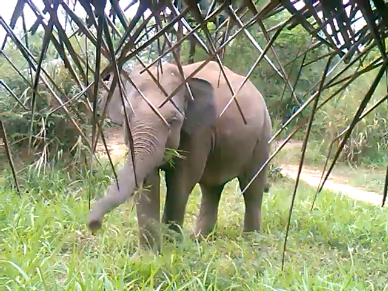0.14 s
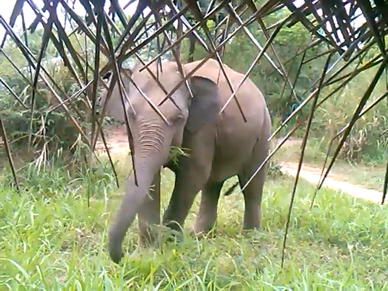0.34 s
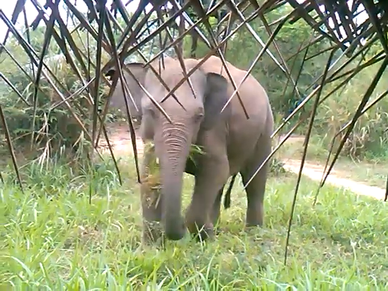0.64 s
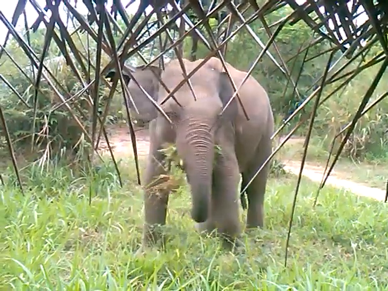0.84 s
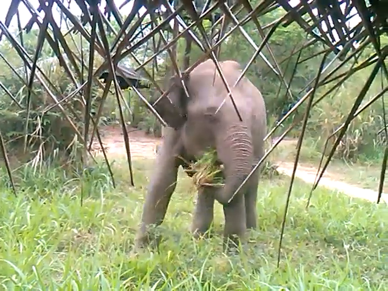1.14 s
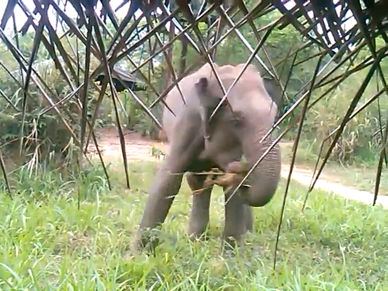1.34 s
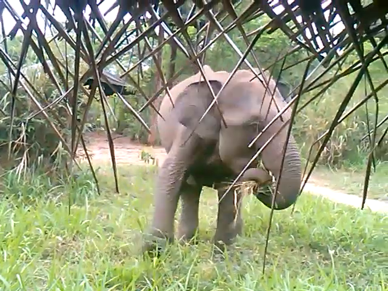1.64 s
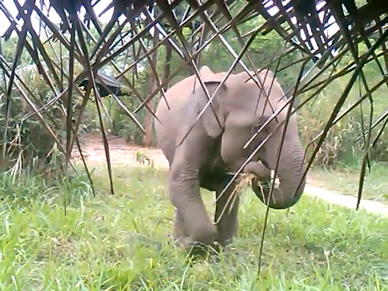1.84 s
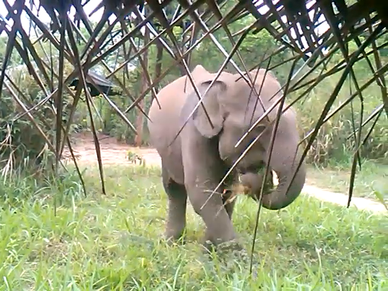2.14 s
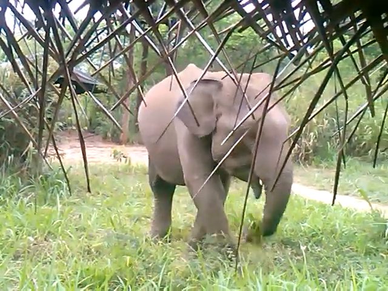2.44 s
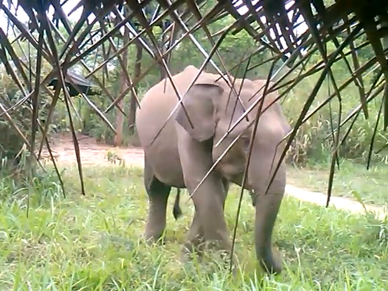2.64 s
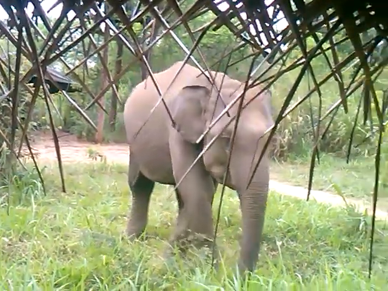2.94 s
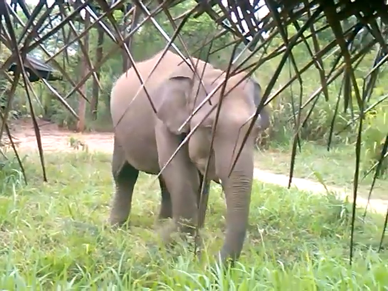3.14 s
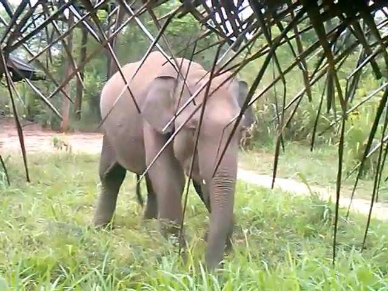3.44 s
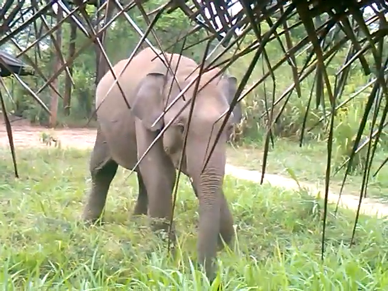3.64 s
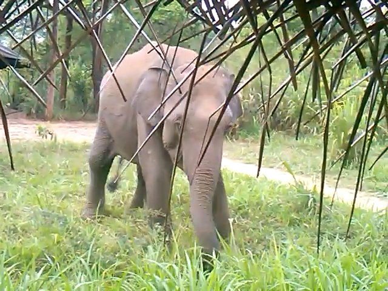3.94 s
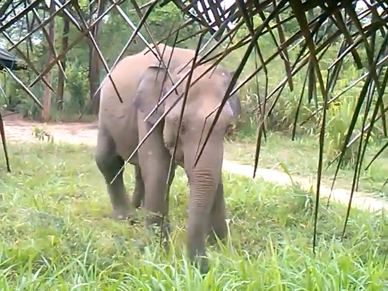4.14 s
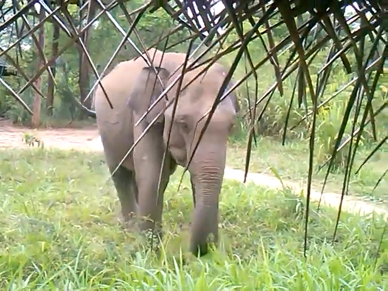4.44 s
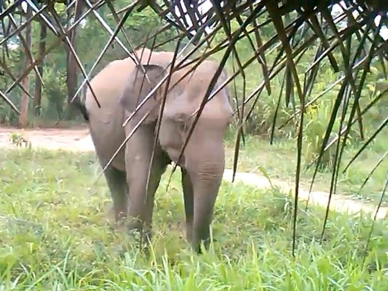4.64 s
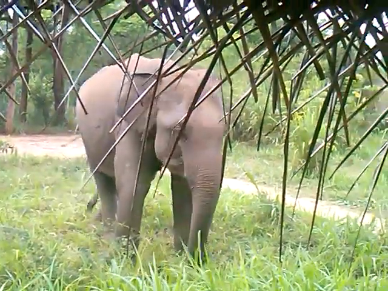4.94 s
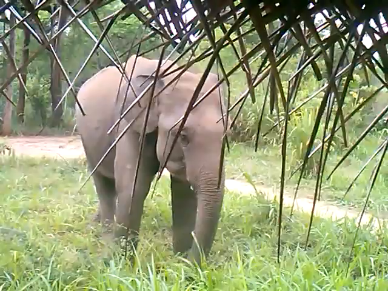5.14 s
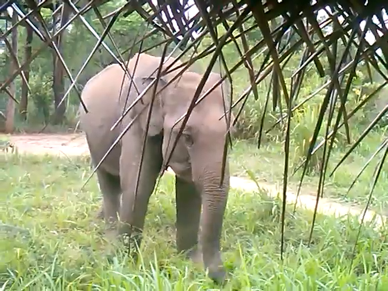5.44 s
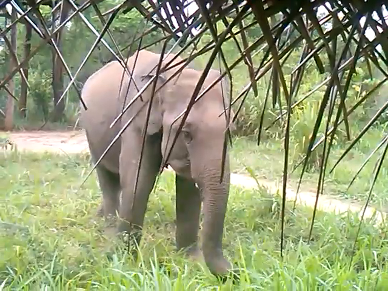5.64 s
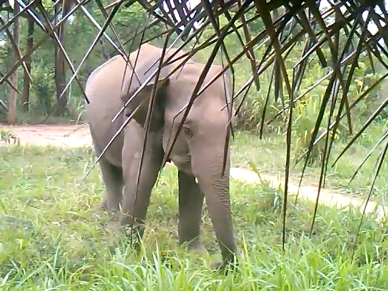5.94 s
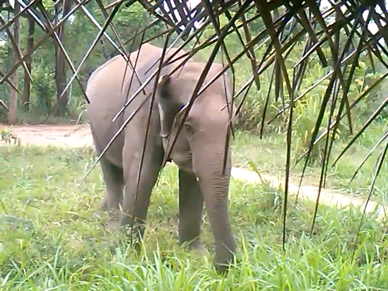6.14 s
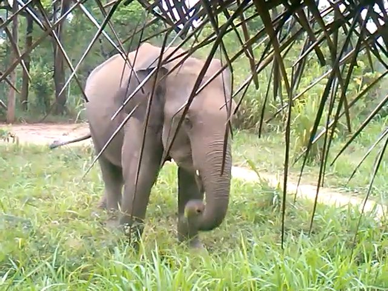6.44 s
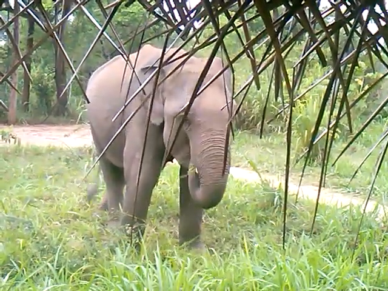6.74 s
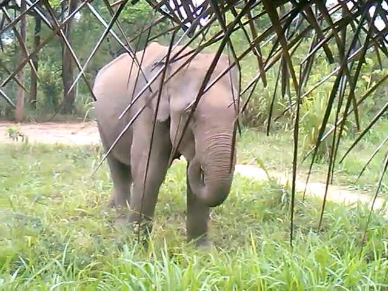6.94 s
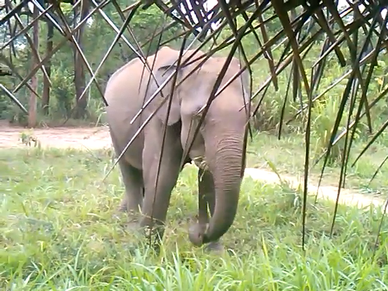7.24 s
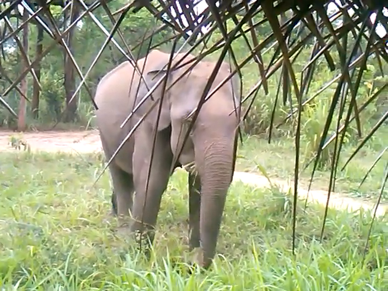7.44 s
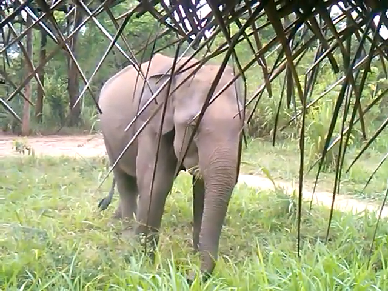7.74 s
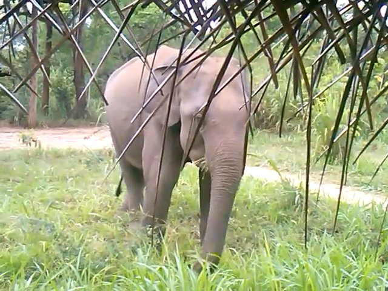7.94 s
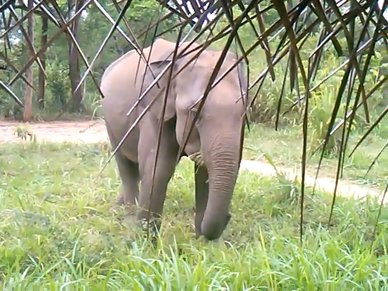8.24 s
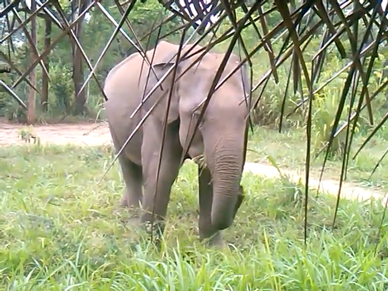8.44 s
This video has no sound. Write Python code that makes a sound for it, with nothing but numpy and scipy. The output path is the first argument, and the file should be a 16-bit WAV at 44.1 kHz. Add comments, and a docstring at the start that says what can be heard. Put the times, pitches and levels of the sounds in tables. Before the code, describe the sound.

Outdoors in a grassy clearing, a large animal tears tufts with its trunk. Dry, bright rustling runs almost throughout, with a cluster of snaps early on, a sharp ripping burst midway and a stronger crackling one later. Small birds chirp and whistle between the trees. The rustle finally fades, leaving faint bird notes, light wind and quiet air, heard by a handheld microphone a few metres away.

```python
"""An elephant a few metres away wades through tall grass and tears up tufts with its trunk.
After a short silence, blades (filtered noise grains) swish and stalks crunch, as one bird (gliding tones)
chirps until about 2 s. Stems snap (noise bursts) in a cluster near 2.1 s; other birds call from then on.
Hard tugs with many cracks come near 4.2 s and, loudest, near 6.1 s. After 7 s the wading sinks away
under faint bird notes. Soft air, wind, hollow tones and dull thumps lie beneath it all."""
import sys
import numpy as np
from scipy import signal
from scipy.fft import rfft, irfft
from scipy.io import wavfile
from scipy.ndimage import uniform_filter1d

SR = 44100
rng = np.random.default_rng(int(sys.argv[2]) if len(sys.argv) > 2 else 0)


def bounce(signal):
    """Save signal as a 16-bit WAV file at the path given by the first command-line argument."""
    frames = np.transpose(np.atleast_2d(signal))
    limited = np.clip(frames, -1, 1)
    pcm = np.round(limited * 32767).astype(np.int16)
    wavfile.write(sys.argv[1], SR, pcm)


N = 378819  # samples, about 8.6 s


def undb(db):
    """Gain of a level in dB."""
    return 10 ** (np.asarray(db) / 20)


def unit(x):
    """Scale to rms 1."""
    return x / np.sqrt(np.mean(x ** 2))


def colour(x, shape):
    """Causal filter through (frequency [Hz], level [dB]) points, from the cepstrum of the log gain."""
    hz, db = np.transpose(shape)
    grid_hz = np.linspace(1, SR / 2, 4097)
    log_gain = np.interp(np.log(grid_hz), np.log(hz), db) * np.log(10) / 20
    cepstrum = irfft(log_gain)
    # folding the second half onto the first makes the filter respond at once, never early
    cepstrum[1:4096] *= 2
    cepstrum[4097:] = 0
    response = irfft(np.exp(rfft(cepstrum)))
    return signal.fftconvolve(x, response)[:N]


def band(x, hz, width_hz):
    """One resonance, gain 1 at its centre."""
    return signal.lfilter(*signal.iirpeak(hz, hz / width_hz, SR), x)


def walk(rate):
    """Random levels held 1 / rate s and smoothed twice; spread near 1."""
    hold = int(SR / rate)
    steps = np.repeat(rng.standard_normal(N // hold + 1), hold)
    return 1.3 * uniform_filter1d(uniform_filter1d(steps, hold), hold)[:N]


def grains(rate, spread_db, tail_s, hiss_db):
    """Noise under the envelope of many small slips: mostly weak, a few stronger, each dying quickly."""
    strength = undb(spread_db * np.minimum(rng.exponential(size=N), 4))
    slips = (rng.random(N) < rate / SR) * strength  # rate: slips per second
    envelope = signal.lfilter([1], [1, -np.exp(-1 / (tail_s * SR))], slips)
    return unit((unit(envelope) + undb(hiss_db)) * rng.standard_normal(N))


def patches(x, edges, flicker_db, rate, tilt_db=0):
    """Split sound into bands that flicker on their own, and lean them all by a tilt in dB per octave."""
    spectrum = rfft(x)
    log_hz = np.log(np.arange(N // 2 + 1) * SR / N + 1)
    octaves = np.log2(edges) - np.log2(edges).mean()
    out = np.zeros(N)
    for octave, share in zip(octaves, np.eye(len(edges))):
        part = irfft(spectrum * np.interp(log_hz, np.log(edges), share), N)
        out += undb(flicker_db * walk(rate) + tilt_db * octave) * part
    return out


# colour of the distant air: (frequency [Hz], relative level per Hz [dB])
AIR_COLOUR = [(100, -31), (160, -25.5), (400, -24), (700, -19.5), (1400, -28), (2600, -22.5), (3500, -35),
              (6000, -42), (10400, -17), (15800, -28)]
AIR_DB = -65.5  # rms


def far_air():
    """Distant leaves and insects: soft noise whose bands flicker separately."""
    noise = colour(rng.standard_normal(N), AIR_COLOUR)
    return undb(AIR_DB) * unit(patches(noise, [160, 400, 900, 2000, 4500, 10000], 1.4, 5))


# wind on the microphone: (time [s], level [dB])
WIND_LEVEL = [(.59, -86), (1, -77), (4, -68.5), (8.59, -69.5)]


def wind():
    """Wind rumbling on the microphone: noise kept to the lowest pitches, slowly uneven."""
    rumble_colour = [(10, 4.0), (25, -3.5), (70, 0), (130, -5.5), (300, -32)]  # (Hz, dB per Hz)
    rumble = patches(colour(rng.standard_normal(N), rumble_colour), [25, 50, 100], 2.4, 4)
    level_db = np.interp(np.arange(N) / SR, *np.transpose(WIND_LEVEL))
    return unit(rumble) * undb(level_db)


# faint hollow tones low in the background:
# (time [s], length [s], pitch [Hz], width of each of two filter passes [Hz], level [dB])
HOLLOW_TONES = [(1.12, 0.28, 742, 12, -70), (1.46, 0.21, 408, 260, -58.5), (1.5, .051, 565, 54, -51.5),
                (1.82, .16, 405, 39, -65.5), (2.53, .04, 422, 120, -59.5), (2.64, 0.24, 570, 93, -62.5),
                (2.7, .1, 123.6, 10, -64), (3.2, .29, 904, 57, -68.5), (3.55, .048, 580, 110, -57),
                (3.8, .09, 745, 17, -63.5), (4.501, .08, 200, 45, -62), (5.41, .04, 856, 100, -58),
                (6.4, .2, 887, 100, -60), (6.65, 0.17, 650, 60, -65.5), (6.93, 0.068, 570, 70, -62.5),
                (8.36, .06, 387, 140, -67.5), (8.43, .15, 760, 34, -70)]


def hoots():
    """Noise ringing twice through one resonance, swelling and fading."""
    out = np.zeros(N)
    for s, length, hz, width, db in HOLLOW_TONES:
        u, i = np.linspace(0, 1, int(length * SR)), int(s * SR)
        ringing = band(band(rng.standard_normal(SR // 2), hz, width), hz, width)
        tone = unit(ringing[-len(u):])  # the end, where the ringing has built up
        swell = np.sin(np.pi * u) ** 0.34
        out[i:i + len(u)] += (undb(db) * swell * tone)[:N - i]
    return out


# dull thumps of feet and of hands on the camera: (time [s], starting level [dB], pitch [Hz])
DULL_THUMPS = [(0.952, -62, 266), (2.853, -45, 40.7), (4.27, -44.5, 139), (4.427, -59, 176),
               (4.871, -51, 66.5), (6.075, -50, 234), (7.329, -48.5, 42.8)]
THUMP_T60_S, THUMP_SLOPE = .165, -.3  # 60 dB decay time at 100 Hz; lower thumps ring longer


def thumps():
    """Low, heavily damped blows: fading sine tones with a softened start."""
    out, t = np.zeros(N), np.arange(16384) / SR
    for s, db, hz in DULL_THUMPS:
        i = int(s * SR)
        t60 = THUMP_T60_S * (hz / 100) ** THUMP_SLOPE
        onset = 1 - np.exp(-t / 0.0044)
        out[i:i + len(t)] += undb(db - 60 * t / t60) * np.sin(2 * np.pi * hz * t) * onset
    return out


def whistles(notes):
    """Gliding, unsteady near-sine notes that swell and fade."""
    out = np.zeros(N)
    for s, length, first_hz, last_hz, db, unsteady in notes:
        u, i = np.linspace(0, 1, int(length * SR)), int(s * SR)
        waver = unit(uniform_filter1d(rng.standard_normal(8192), size=60))[:len(u)]
        glide = 1 - (1 - u) ** 1.7  # the pitch levels off towards the end
        hz = (first_hz + (last_hz - first_hz) * glide) * (1 + unsteady * waver)
        tone = np.sin(2 * np.pi * np.cumsum(hz) / SR)
        out[i:i + len(u)] += (undb(db) * np.sin(np.pi * u) ** .5 * tone)[:N - i]
    return out


# one bird's rising chirps: (time [s], length [s], first pitch [Hz], last pitch [Hz], level [dB])
RISING_CHIRPS = [(.745, .017, 2420, 2450, -63.5), (1.03, .014, 2080, 2350, -52),
                 (1.054, 0.016, 2310, 2520, -51), (1.193, 0.015, 2190, 2550, -51.5),
                 (1.21, 0.029, 2780, 3260, -49), (1.405, 0.028, 1990, 2860, -49.5),
                 (1.716, 0.0172, 2150, 2690, -50.5), (1.753, 0.03, 2310, 2624, -46),
                 (1.927, 0.024, 2200, 2550, -51), (1.948, 0.022, 2720, 3280, -45.5)]
# a second bird's falling notes: (time [s], length [s], level [dB])
FALLING_NOTES = [(3.463, 0.023, -50), (3.592, 0.014, -45), (3.743, 0.019, -44), (4.077, 0.043, -44.5),
                 (4.35, 0.045, -43.5), (4.539, 0.033, -45.5), (4.832, 0.049, -46)]
FALL_START_HZ, FALL_HZ_PER_S = 3950, 19000  # shared start pitch and average pace of the drop
# notes of the other birds: (time [s], length [s], first pitch [Hz], last pitch [Hz], level [dB],
# unsteadiness [share of the pitch])
OTHER_NOTES = [(2.285, .02, 3100, 3200, -52, .03), (2.735, .022, 4430, 4320, -46, .02),
               (3.42, .017, 2350, 2550, -52, .03), (3.69, .016, 2300, 2620, -49, .015),
               (3.875, .085, 3800, 2240, -47, .02), (4.24, .07, 2330, 2306, -46, .003),
               (4.69, .032, 2750, 3050, -47, .045), (6.333, .05, 2400, 2950, -46, .01),
               (6.357, .026, 1370, 1490, -47, .006), (6.515, .037, 2570, 2950, -45.5, .09),
               (7.36, .026, 910, 940, -64, .01), (7.4, .13, 2580, 2760, -75, .01),
               (7.45, .17, 3420, 3640, -70, .01), (7.5, .11, 1910, 1780, -67, .065),
               (7.53, .083, 2800, 2920, -72, .003), (7.655, .17, 3610, 4700, -57.5, .02),
               (7.665, .015, 2100, 2400, -66, .03), (7.76, .05, 3250, 3230, -70, .01),
               (7.772, .028, 4600, 5080, -52, .013), (7.8, .08, 3250, 2950, -63, .015),
               (7.862, .17, 2970, 2750, -67, .008), (8.2, .11, 2550, 2630, -70, .017),
               (8.245, .02, 4500, 4100, -72, .03), (8.32, .022, 4600, 4160, -67, .03),
               (8.377, .035, 1900, 1840, -66, .065), (8.4, .025, 5450, 5650, -73, .02),
               (8.5, .03, 5800, 5730, -72, .01), (8.52, .056, 5750, 3950, -65, .006)]
CHIRP_WAVER, FALL_WAVER = 0.043, 0.028  # unsteadiness as a share of the pitch
ECHO_S, ECHO_DB = 0.025, -3.5  # a nearby surface repeats each chirp


def birds():
    """All birds, smeared by the trees; the chirping one also comes back from a nearby surface."""
    chirps = whistles([(*chirp, CHIRP_WAVER) for chirp in RISING_CHIRPS])
    falls = whistles([(s, length, FALL_START_HZ, FALL_START_HZ - FALL_HZ_PER_S * length, db, FALL_WAVER)
                      for s, length, db in FALLING_NOTES])
    echo = undb(ECHO_DB) * np.roll(chirps, int(ECHO_S * SR))
    direct = whistles(OTHER_NOTES) + falls + chirps + echo
    t = np.arange(SR // 2) / SR
    fading = undb(-60 * t / .15) + .7 * undb(-60 * t / .6)  # near trunks, far canopy
    trees = rng.standard_normal(len(t)) * fading
    smear = signal.fftconvolve(direct, trees / np.sqrt(np.sum(trees ** 2)))[:N]
    return direct + undb(-0.5) * smear


# breaking fibres: (time [s], crack peak level before the blade colour [dB], woody knock peak level [dB],
# centre of the crack [Hz], dryness [dB])
BREAKS = [(0.936, -25.5, -56, 8840, 0.5), (1.379, -25, -56, 10100, 8), (1.394, -46, -46, 10100, 0),
          (1.626, -20.5, -56, 8900, -7), (1.661, -23, -55, 7040, -2), (1.6813, -21.5, -58, 8630, -3),
          (2.1033, -32.5, -46, 10200, 6), (2.1157, -23, -35, 7010, 2), (2.123, -21, -23, 7650, 0),
          (2.137, -17.5, -21.5, 4500, -7), (2.1881, -15.5, -22, 5000, -8), (2.5847, -28, -51, 6590, -3),
          (2.757, -37, -46, 10400, 0), (3.5126, -34, -42, 7170, 6), (3.5574, -27, -57, 10500, 3),
          (3.578, -22, -46, 7030, 2), (4.159, -24, -46, 7740, 0), (4.1765, -14, -25, 5390, 9),
          (4.2, -14, -25.5, 7070, 6), (4.2213, -12, -24.5, 7620, 0), (4.2467, -15, -30, 6900, 0),
          (4.2632, -13, -28, 3850, 0.5), (4.2884, -19, -18.5, 9830, 4), (4.308, -23, -30, 10900, 0),
          (4.3368, -20, -31, 6570, 0), (4.3856, -24, -40, 7600, 12), (4.4447, -38, -28.5, 7850, -7),
          (4.6287, -13, -55, 11000, 0), (4.67, -29, -39, 3600, 1), (5.9146, -25, -32, 7400, -5),
          (6.045, -20, -39, 8010, 0), (6.0691, -4, -18, 5200, 2), (6.095, -6.5, -15.5, 7660, 4.5),
          (6.1206, -10.5, -32, 11800, -3), (6.1409, -8, -19, 6620, 6), (6.1644, -9, -19.5, 7090, 7),
          (6.1813, -9, -22, 5930, 5), (6.1923, -11, -16.5, 2600, -3.5), (6.2082, -9, -28, 6970, 0),
          (6.2164, -4, -28, 9400, -2), (6.2578, -5.5, -27.5, 8500, 7.5), (6.316, -33, -29, 9940, 14),
          (6.406, -7.5, -54, 8440, 13), (7.0646, -45, -41.5, 10100, -3), (7.1468, -36, -43, 5810, 0),
          (7.36, -55, -42.5, 3200, -3), (7.9982, -36.5, -63, 10900, -12), (8.0284, -40, -55, 7460, -3),
          (8.1004, -50, -54, 10100, 1), (8.1764, -47, -68, 7330, 0), (8.483, -41, -68, 9900, -15)]
# stalk resonances: (pitch [Hz], width [Hz], relative level [dB])
STALK_RESONANCES = [(560, 190, -14), (1193, 110, -7), (1890, 670, -2), (3100, 1500, -9.5)]
# colour of the blades, for cracks here and the swish below: (frequency [Hz], relative level per Hz [dB])
BLADE_COLOUR = [(900, -42), (1500, -17), (2400, -12), (3200, -13), (4100, -6.5), (6000, -5), (7500, -2),
                (8400, -5), (10200, -2), (11200, -4), (12100, -5), (13000, -7), (15800, -9.5)]
# fray times hold at dryness 0; T60 is the time to fall 60 dB
FRAY_RISE_S, FRAY_T60_S, CRACK_T60_S = 0.001, .04, 0.0034


def snaps():
    """Each break starts with a crack, sharp in dry stems, and frays out; a knock rings the stalk."""
    crack, knock, t = np.zeros(N), np.zeros(N), np.arange(8192) / SR
    for s, crack_db, knock_db, hz, dry_db in BREAKS:
        i = int(s * SR)
        crack_noise, knock_noise, steps = rng.standard_normal((3, len(t)))
        ragged = undb(4.03 * unit(uniform_filter1d(steps, size=40)))  # fibres part in several steps
        # green stems give way slower and fray longer
        rise = 1 - np.exp(-t / (FRAY_RISE_S * undb(-dry_db)))
        fade = undb(-60 * t / (FRAY_T60_S * undb(-.4 * dry_db)))
        force = undb(dry_db - 60 * t / CRACK_T60_S) + ragged * rise * fade
        burst = band(force * crack_noise, hz, 0.6 * hz)  # thin stems crack higher
        crack[i:i + len(t)] += (undb(crack_db) * burst / np.abs(burst).max())[:N - i]
        blow = sum(undb(db) * band(force * knock_noise, f, width) for f, width, db in STALK_RESONANCES)
        knock[i:i + len(t)] += (undb(knock_db) * blow / np.abs(blow).max())[:N - i]
    return colour(crack, BLADE_COLOUR) + knock


# steady wading: (time [s], swish level [dB], crunch level [dB], brightness [dB per octave])
STEADY_WADING = [(.59, -53.5, -72, 3.5), (.77, -69.5, -82, -1), (.92, -45.5, -56, 1), (1.15, -51, -59, 3.5),
                 (1.5, -49.5, -53.5, 3), (1.9, -44, -54, 3), (2.32, -46.5, -53, 3.5),
                 (2.68, -45.5, -54.5, 2.5), (3.08, -53.5, -58, -2), (3.5, -51.5, -57.5, 3.5),
                 (3.9, -44, -53.5, -3), (4.55, -45, -54, 1), (4.8, -47.5, -55, -1), (5.1, -48, -59, 0),
                 (5.6, -45, -56, 0.5), (6.45, -45, -53.5, 0.5), (7.0, -48, -57.5, -3), (7.25, -59, -57, 2),
                 (7.43, -63.5, -62.5, 0), (7.81, -62, -65.5, -1.5), (8.2, -68.5, -68, -4.5)]
WADING_BASS_DB, BASS_PER_BRIGHT = 0.9, -0.16  # dB per octave; duller wading crunches deeper
# strides, sweeps and tugs of the trunk: (peak time [s], swish level [dB], crunch level [dB],
# brightness [dB per octave], bass of the crunch [dB per octave], rise over 10 dB [s], fall over 10 dB [s]);
# rises and falls below 0.004 s, also negative ones, count as 0.004 s
TRUNK_TUGS = [(.95, -43.5, -52.5, 0.5, 1, 0.01, .11), (1.39, -47.5, -59, 4, 3, 0.07, -0.33),
              (1.64, -42, -60, -5.5, 15, 0.04, -0.07), (1.95, -46, -61, 2, -6, 0.24, -0.04),
              (2.146, -37, -49, 1.5, -2, 0.0649, 0), (2.21, -36.5, -48.5, 2.5, -4.5, 0.08, .08),
              (2.6, -57, -57, 0, 2.5, 0.2, -0.1), (3.17, -46.5, -57.5, 3, -2, 0.1, 0.15),
              (3.67, -34.5, -48.5, -1, -0.5, 0.095, 0.18), (4.225, -31, -48, -2, -8, 0.06, 0.13),
              (4.29, -32.5, -37, 1.5, 1, 0.08, 0.0638), (4.454, -43, -42, 0, 2, -0.02, 0.095),
              (5.18, -43.5, -67, 4.5, 6, 0.1, .2), (5.25, -52, -47, 2.5, 0.5, .07, 0.12),
              (5.33, -38, -62, 0.5, -4, .1, 0.15), (5.74, -37.5, -55.5, 0, -3.5, 0.07, 0.34),
              (5.87, -40.5, -58, -2, 1, -0.11, 0.12), (6.052, -31.5, -52, -3, -7, 0.05, 0.068),
              (6.1, -24.5, -40.5, -6, 2, 0.04, 0.0341), (6.18, -26.5, -44, -4, 5, 0.028, 0.0819),
              (6.27, -33.5, -41, 13, -1.5, 0.1457, 0.01), (6.33, -46, -43, 15, 0.5, 0.06, 0.0353),
              (6.7, -46, -55.5, -1.5, -3.5, 0.2, 0.04), (7.01, -47, -56, 0, -3.5, .1, 0.0957),
              (6.82, -47, -64, 2, 0, -0.25, 0.04), (7.189, -43, -54, -6.5, 0, 0.07, 0.0342)]


def motion():
    """Wading and tugs add up in power, the louder setting the colour: swish and crunch gains, both tilts."""
    t = np.arange(0, N / SR + .004, .002)
    s, *steady = np.transpose(STEADY_WADING)
    swish_db, crunch_db, bright_db = (np.interp(t, s, column) for column in steady)
    bass_db = WADING_BASS_DB + BASS_PER_BRIGHT * bright_db
    columns = np.transpose(TRUNK_TUGS)[:, :, None]
    peak, tug_swish_db, tug_crunch_db, tug_bright_db, tug_bass_db, rise, fall = columns
    rising = (peak - t) / np.maximum(rise, .004)
    falling = (t - peak) / np.maximum(fall, .004)
    shape_db = -10 * np.where(t < peak, rising, falling)
    # power of the wading in row 0, of each tug below it
    swish = undb(np.vstack([swish_db, tug_swish_db + shape_db])) ** 2
    crunch = undb(np.vstack([crunch_db, tug_crunch_db + shape_db])) ** 2
    swish_sum, crunch_sum = swish.sum(axis=0), crunch.sum(axis=0)
    bright = (swish[0] * bright_db + np.sum(swish[1:] * tug_bright_db, axis=0)) / swish_sum
    bass = (crunch[0] * bass_db + np.sum(crunch[1:] * tug_bass_db, axis=0)) / crunch_sum
    curves = np.sqrt(swish_sum), np.sqrt(crunch_sum), bright, bass
    return (np.interp(np.arange(N) / SR, t, curve) for curve in curves)


# colour of the stalks and roots: (frequency [Hz], relative level per Hz [dB])
STALK_COLOUR = [(60, -12), (140, -7), (300, -5), (580, -3), (1000, -2.5), (1900, -5.5), (3000, -4),
                (5000, -11.5)]


def crunching(gain, bass_db):
    """Stalks and roots give way in coarser, darker grains."""
    crunch = unit(colour(grains(400, 0.82, 0.0042, 3.0), STALK_COLOUR))
    return gain * patches(crunch, [120, 250, 550, 1100, 2200], 2.2, 11, -bass_db)


def swishing(gain, bright_db):
    """Blades brush past each other in fine grains; different blades lead from moment to moment."""
    brush = unit(colour(grains(1200, 0.88, 0.0042, 2.2), BLADE_COLOUR))
    ticks = unit(colour(grains(350, 3.5, .00015, -30), BLADE_COLOUR))  # single blades tearing
    share = undb(-1) * gain ** .25  # the harder the pull, the more the tearing stands out
    edges = [2460, 3920, 5760, 8400, 11000, 14400]
    return gain * patches(brush + share * ticks, edges, 1.48, 9, bright_db)


def grass():
    """The elephant's movement drives the crunch and the swish together."""
    swish_gain, crunch_gain, bright_db, bass_db = motion()
    return crunching(crunch_gain, bass_db) + swishing(swish_gain, bright_db)


def scene():
    """All sources reach one microphone; both channels are the same."""
    mono = far_air() + wind() + hoots() + thumps() + birds() + snaps() + grass()
    return np.array([mono, mono])


# converter offset: (time [s], level [share of full scale])
CONVERTER_OFFSET = [(.59, 0), (2, 0.0007), (5, 0.0014), (8.59, 0.00077)]
START_S, TOP_HZ = .5855, 15830  # silence before the start; edge of the treble cut


def record(dry):
    """The sound starts after a silence, carries a small offset and is cut sharply at the top."""
    t = np.arange(N) / SR
    offset = np.interp(t, *np.transpose(CONVERTER_OFFSET))
    live = (dry + offset) * (t > START_S)
    return signal.sosfilt(signal.ellip(12, .2, 80, TOP_HZ, fs=SR, output="sos"), live)


dry = scene()
out = record(dry)
bounce(out)
```